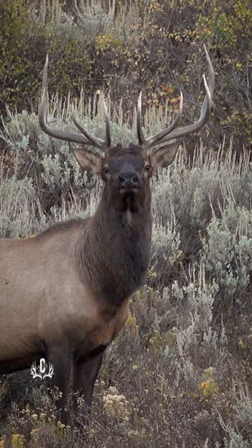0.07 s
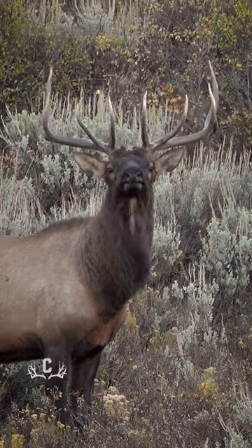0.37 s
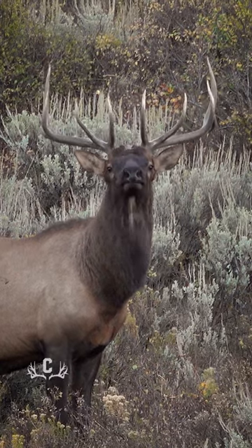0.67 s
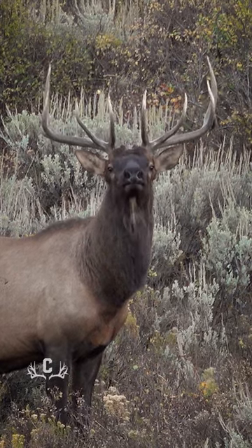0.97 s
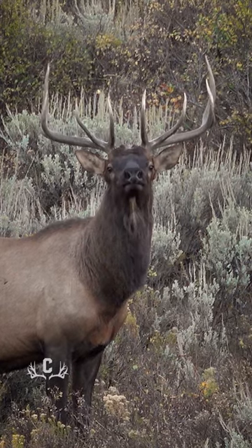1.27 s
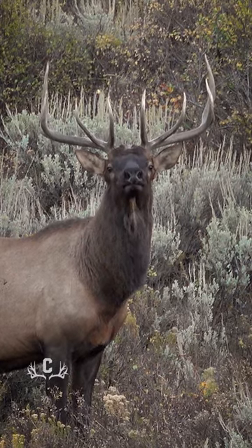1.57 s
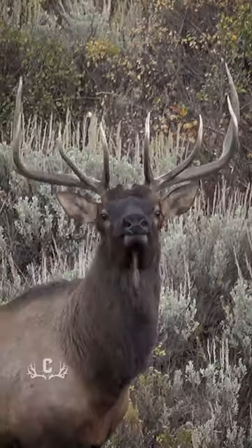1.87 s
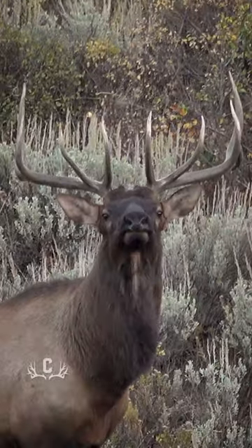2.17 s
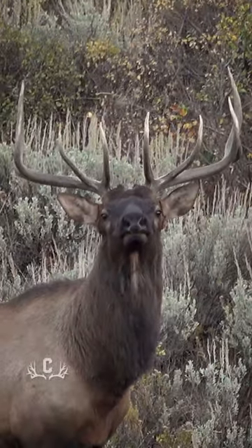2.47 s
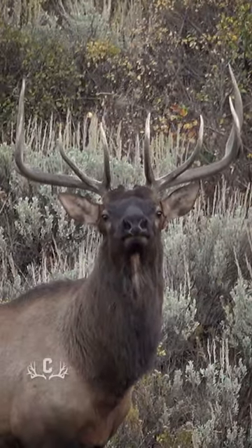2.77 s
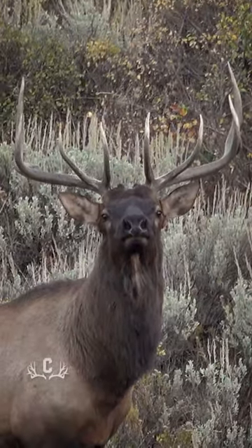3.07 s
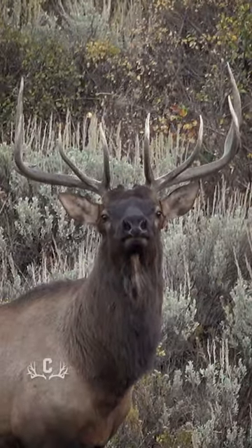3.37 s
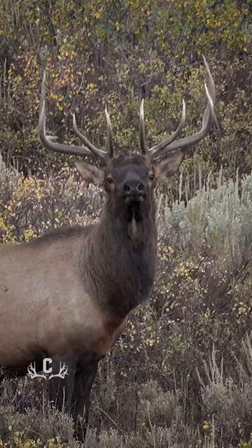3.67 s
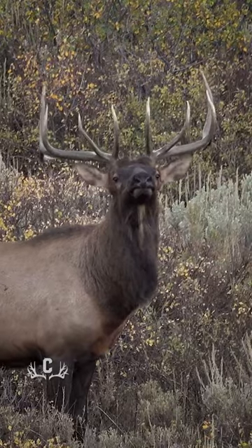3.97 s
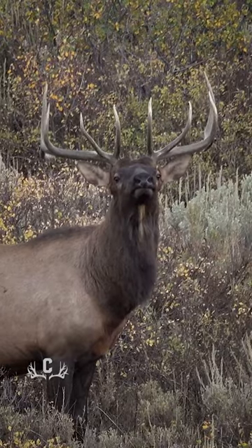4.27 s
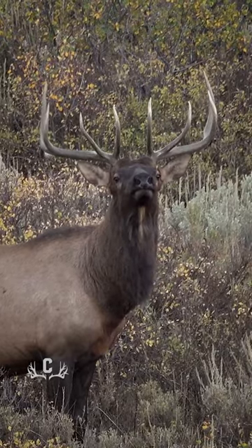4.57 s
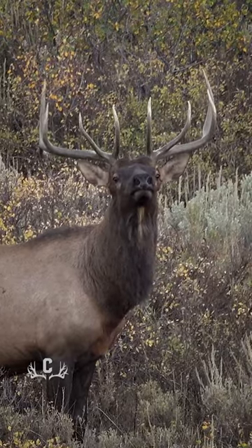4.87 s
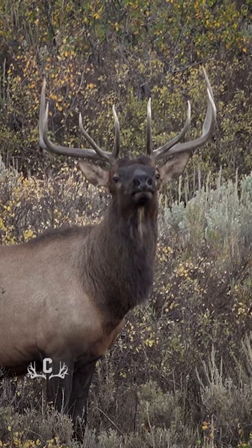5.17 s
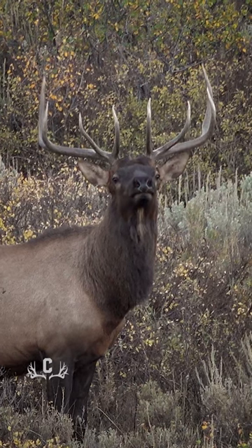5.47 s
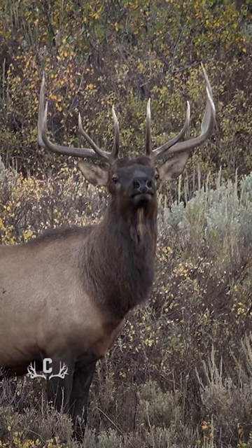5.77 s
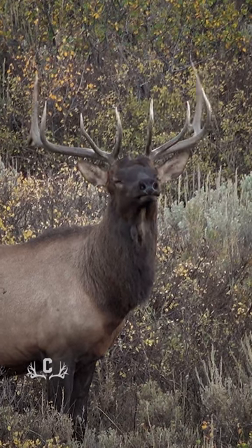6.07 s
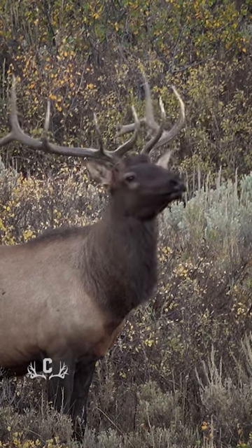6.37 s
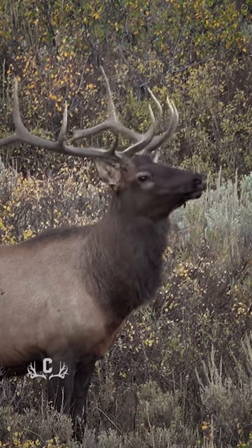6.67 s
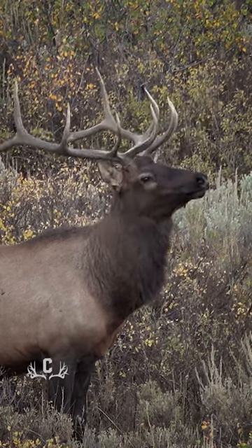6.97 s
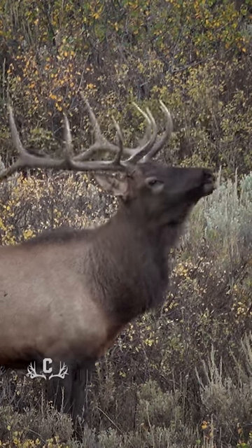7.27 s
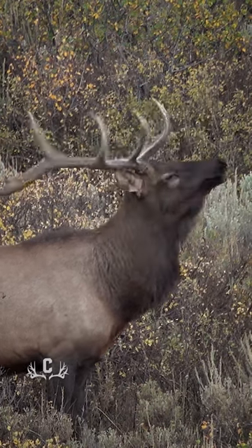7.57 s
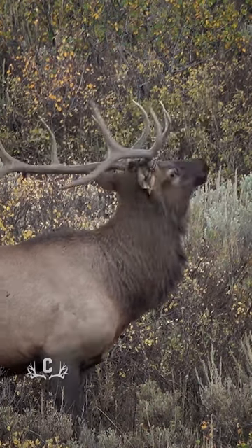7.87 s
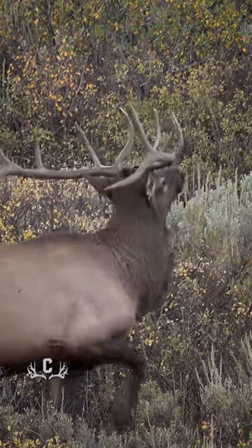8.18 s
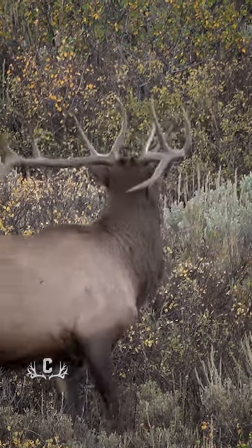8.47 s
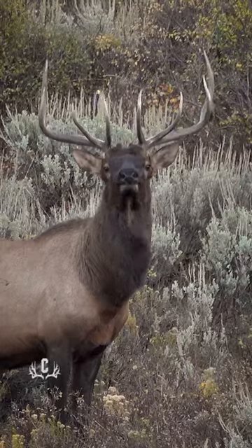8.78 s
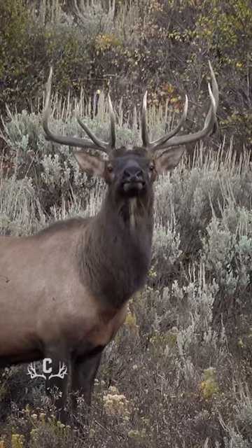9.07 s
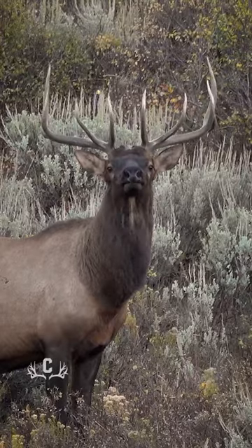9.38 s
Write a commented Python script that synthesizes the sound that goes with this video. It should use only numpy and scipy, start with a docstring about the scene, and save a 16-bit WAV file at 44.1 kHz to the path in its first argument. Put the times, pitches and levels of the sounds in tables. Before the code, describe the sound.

A bull elk barks five times, short rasping yelps and gruff calls, over faint distant insects in quiet scrubland.

```python
"""Quiet scrubland by a brushy slope, one microphone. A bull elk barks five times: three open yelps, two gruff.
Each bark sweeps up as the vocal folds tighten, breaks into a rasp and sinks into a soft, clean moan.
Nearby brush scatters the calls and the hillside answers. Far off, an insect chorus throbs in still air;
under it all lie the recorder's hiss, hum and whine."""
import sys
import numpy as np
from scipy import signal
from scipy.fft import rfft, irfft, next_fast_len
from scipy.io import wavfile
from scipy.ndimage import uniform_filter1d, map_coordinates

SR = 44100
rng = np.random.default_rng(int(sys.argv[2]) if len(sys.argv) > 2 else 0)


def unload_audio(sound):
    """Save the sound as a 16-bit wav file, at the path given as the first command line argument."""
    columns = np.transpose(np.atleast_2d(sound))
    # keep every value between -1 and 1, then stretch to whole-number steps
    steps = np.round(np.clip(columns, -1, 1) * 32767)
    wavfile.write(sys.argv[1], SR, steps.astype(np.int16))


N = 424683


def amp(db):
    """Decibels to gain."""
    return 10 ** (np.asarray(db) / 20)


def unit(x):
    """Scale to rms 1."""
    return x / np.sqrt(np.mean(x ** 2) + 1e-20)


def along(points, hz):
    """Read (f/Hz, value) points on a log frequency axis."""
    f, v = np.transpose(points)
    return np.interp(np.log(hz + 1), np.log(f + 1), v)


def wobble(rate, size):
    """A smooth random curve with rate knots a second."""
    return map_coordinates(rng.standard_normal(size + 4), [np.arange(size) * rate / SR], mode="nearest")


def filtered(x, response):
    """Pass x through a complex frequency response."""
    m = next_fast_len(len(x) + 8192)
    return irfft(rfft(x, m) * response(np.fft.rfftfreq(m, 1 / SR)), m)[:len(x)]


def noise(spectrum):
    """Steady noise of rms 1, coloured by (f/Hz, relative level/dB) points."""
    return unit(filtered(rng.standard_normal(N), lambda hz: amp(along(spectrum, hz))))


# Still air and hiss at the microphone: f/Hz, relative level/dB
AIR_SPECTRUM = [(25, -25), (70, -13.5), (150, -9), (350, -2.5), (650, -3.5), (1100, -6.5), (1800, -10.5),
                (3000, -16.5), (4500, -19), (6500, -19.5), (10000, -22.5), (16000, -28.5)]
# Mains hum in the recorder: f/Hz, level/dB
HUM_LINES = [(50.5, -68.5), (101.3, -67.5), (152, -69), (202.5, -71)]


def noise_floor(air_db=-50, whine_hz=13169, whine_db=-72.5):
    """Still air and hiss, with mains hum and a thin electrical whine."""
    t = np.arange(N) / SR
    lines = HUM_LINES + [(whine_hz, whine_db)]
    tones = sum(amp(db) * np.sqrt(2) * np.sin(2 * np.pi * (hz * t + rng.random())) for hz, db in lines)
    return amp(air_db) * noise(AIR_SPECTRUM) + tones


# The insect chorus, heard from far off: f/Hz, relative level/dB
INSECT_SPECTRUM = [(1750, -36), (2000, -22), (2110, -12.5), (2170, -9.5), (2255, -4.5), (2310, -6.5),
                   (2400, -8), (2520, -12.5), (2700, -22), (3100, -34)]


def insects(chorus_db=-50, flutter_db=1, flutter_rate=45, throb=0.13, throb_hz=27.26):
    """Many far insects merge into one narrow band that throbs loosely with their wing strokes."""
    stroke_hz = throb_hz * (1 + 0.102 * wobble(7, N))
    strokes = np.sin(2 * np.pi * np.cumsum(stroke_hz) / SR)
    level = amp(chorus_db + flutter_db * wobble(flutter_rate, N))
    return level * (1 + throb * strokes) * noise(INSECT_SPECTRUM)


# Time for the far hillside's wash to fall 60 dB: f/Hz, t/s
SLOPE_DECAY = [(200, 1), (600, 1.0), (1400, 0.48), (3500, 0.19)]
# Distinct returns from the hillside to the microphone: delay/s, level/dB
SLOPE_ECHOES = [(0.065, -23), (.11, -25)]


def slope(x, near_db=-14, near_t60=0.22, far_db=-19, swell_s=0.0077, low_hz=430):
    """Nearby brush scatters each bark at once; the hillside returns two soft echoes and a faint wash."""
    hz, t, (near, far) = signal.stft(rng.standard_normal((2, SR)), SR, nperseg=256)
    swell = 1 - np.exp(-(t / swell_s) ** 2)
    far_t60 = along(SLOPE_DECAY, hz)[:, None]
    brush = signal.istft(near * swell * amp(-60 * t / near_t60), SR, nperseg=256)[1]
    wash = signal.istft(far * swell * amp(-60 * t / far_t60), SR, nperseg=256)[1]
    echo = amp(near_db) * brush / np.linalg.norm(brush) + amp(far_db) * wash / np.linalg.norm(wash)
    for delay, db in SLOPE_ECHOES:
        echo[round(delay * SR)] += amp(db)
    # twigs hardly scatter the long waves
    return filtered(signal.fftconvolve(x, echo)[:N], lambda f: f ** 4 / (f ** 4 + low_hz ** 4))


def huffs(lead_s=0.0071, spread_s=0.052, thump_db=-57, hiss_db=-59):
    """A soft huff of air leads into each bark, just before the folds catch."""
    t = np.arange(N) / SR
    flow = sum(np.exp(-((t - start + lead_s) / spread_s) ** 2) for start, *_ in BARKS)
    thump = amp(thump_db) * noise([(20, -3), (70, -4), (200, -19), (600, -90)])
    hiss = amp(hiss_db) * noise([(800, -20), (2800, 4), (5000, -3), (8000, -24), (12000, -40)])
    return flow * (thump + hiss)


def rush(voice):
    """Air forced out with each bark adds a faint low rumble and a thin hiss."""
    flow = np.abs(uniform_filter1d(voice ** 2, size=4000)) ** 0.23
    rumble = amp(-42) * noise([(15, 11), (45, -14), (80, -11), (200, -30), (600, -90)])
    hiss = amp(-48) * noise([(1500, -40), (2700, 4), (3300, 5), (4500, -8), (7000, -15), (12000, -40)])
    return flow * (rumble + hiss)


# A thin whistle in the hardest bark: t/s, length/s, f/Hz, level/dB
SQUEAKS = [(4.139, 0.059, 3260, -57)]


def squeaks(waver=0.016):
    """Air whistles briefly in the narrowed throat."""
    out = np.zeros(N)
    for start, length, hz, db in SQUEAKS:
        size = round(length * SR)
        phase = 2 * np.pi * np.cumsum(hz * (1 + waver * wobble(220, size))) / SR
        out[round(start * SR):][:size] += amp(db) * unit(np.sin(phase) * signal.windows.tukey(size, .5))
    return out


def pitch_law(t, climb_s, break_s, top_hz, moan_hz, start_hz=321.45, warble_per_s=7.5, sag_hz_per_s=270):
    """The pitch climbs evenly, dips once if the top is held, breaks down to the moan and sags."""
    climb = start_hz * (top_hz / start_hz) ** np.minimum(t / climb_s, 1)
    hold_s = max(break_s - climb_s, 1 / SR)
    held = np.clip((t - climb_s) / hold_s, 0, 1)
    strained = climb * (1 - warble_per_s * hold_s * np.sin(np.pi * held) ** 2)
    after = np.maximum(t - break_s, 0)
    # at the break most of the tension goes at once; the rest ebbs
    tension = .82 * np.exp(-after / .003) + .18 * np.exp(-after / .028)
    return moan_hz + (strained - moan_hz) * tension - sag_hz_per_s * after


# Stages of a bark: the time at which the blast ends, then the lengths of the others
BLAST_END_S = 0.076
ATTACK_S, DROP_S, CRY_S, LULL_S, PUSH_S, RELEASE_S = 0.007, 0.011, 0.028, 0.046, 0.02, 0.022


def effort_law(t, blast_s, onset_db, blast_db, cry_db, moan_db,
               floor_db=-41, lull_db=-6.5, fade_db_per_s=71):
    """Level in dB: a swell to the blast, a drop to the cry, a lull, a last push that fades as the moan."""
    later_stages = np.cumsum([BLAST_END_S, DROP_S, CRY_S, LULL_S, PUSH_S])
    times = [0, ATTACK_S, min(blast_s, BLAST_END_S), *later_stages]
    levels = [floor_db, onset_db, blast_db, blast_db, cry_db, cry_db, moan_db + lull_db, moan_db]
    db = np.interp(t, times, levels) - fade_db_per_s * np.maximum(t - times[-1], 0)
    release = np.minimum((t[-1] - t) / RELEASE_S, 1)
    return floor_db + (db - floor_db) * release


def rasp_law(t, climb_s, break_s, hoarse, rasp_s, moan_rough=0.13, rasp_rough=0.54, lag_s=0.0087):
    """Roughness 0-1: the folds grow hoarse on the climb, chaotic at the break, nearly clean in the moan."""
    strain = np.minimum(t / climb_s, 1) * np.clip(1 - (t - break_s) / CRY_S, 0, 1)
    chaos = np.exp(-((t - break_s - lag_s) / rasp_s) ** 2)
    return np.clip(moan_rough + (hoarse - moan_rough) * strain + rasp_rough * chaos, .01, .95)


def throat(source, modes, low_hz=235, high_hz=3600):
    """Throat and mouth ring in steep-sided resonances with dark valleys between them."""
    def response(f):
        peaks = sum((-1) ** k * amp(db) * (1j * f * width / (hz * hz - f * f + 1j * f * width)) ** 2
                    for k, (hz, width, db) in enumerate(modes))
        return peaks * f ** 6 / (f ** 6 + low_hz ** 6) / (1 + (f / high_hz) ** 8)
    return filtered(source, response)


def bark(t, pitch, db, rough, modes, slack_s, overtone_db,
         drift=0.0243, jitter=0.0956, rolloff=0.41, slack_db=-9, closing_s=0.012):
    """Vocal folds glide along the pitch; when driven hard they beat unevenly and rasp."""
    size = len(t)
    # cycles vary in length and strength as the roughness grows
    pitch = pitch * (1 + drift * wobble(72.96, size) + jitter * rough * wobble(352.2, size))
    phase = 2 * np.pi * np.cumsum(pitch) / SR
    strength = np.sqrt(2 * (1 - rough ** 2)) * amp(3 * rough * wobble(407, size))
    # pressed folds are rich in overtones; slack ones give a nearly pure moan
    press = amp(overtone_db + slack_db * (1 + np.tanh((t - slack_s) / 0.024)) / 2)
    closure = 1 - np.exp(-(t / closing_s) ** 2)  # the folds take a moment to close fully
    overtones = press * closure * sum((k - 1) ** -rolloff * np.sin(k * phase) for k in range(2, 9))
    # at the break strong and weak cycles alternate
    subharmonics = amp(-5) * rough * (np.sin(phase / 2) + np.sin(3 * phase / 2))
    puffs = rng.standard_normal(size) * (1 + 0.82 * np.cos(phase))  # turbulence, one puff a cycle
    tone = strength * np.sin(phase) + throat(strength * (overtones + subharmonics), modes)
    voice = tone + rough * unit(throat(puffs, modes))
    # every mix of tone and noise is equally loud
    voice = voice / np.sqrt(np.abs(uniform_filter1d(voice ** 2, size=400)) + 1e-9)
    # after the blast the level dips in brief, uneven fades
    fades_db = 3.5 * (.7 - wobble(64.9, size) ** 2) * np.clip((t - BLAST_END_S) / CRY_S, 0, 1)
    shudder_db = 2.5 * rough * (.5 - wobble(110.5, size) ** 2)
    return amp(db + fades_db + shudder_db) * voice * signal.windows.tukey(size, .03)


# Resonances of four shapes of throat and mouth: f/Hz, width/Hz, level/dB
YELP_THROAT = [(270, 310, -2.5), (752, 180, 3.5), (1080, 94, -1.5), (1436, 255, 2), (1697, 160, -5.5),
               (1947, 176, 0), (2410, 210, -17.5), (2800, 310, -15.5)]
GRUFF_THROAT = [(310, 113, 6), (590, 220, -3), (854, 190, -4), (1103, 160, -6.5), (1480, 600, -14.5),
                (2590, 700, -24)]
SHARP_THROAT = [(260, 170, 1), (644, 330, 5.5), (1030, 180, 0), (1330, 230, -1), (1685, 230, 2),
                (1990, 120, -3), (2300, 164, -0.5), (2810, 390, -9.5), (3220, 130, -23)]
GRUNT_THROAT = [(395, 260, 6), (570, 135, -1.5), (713, 65, 5), (975, 140, -3), (1290, 160, -3),
                (1700, 860, -19), (3260, 230, -26)]
# How well each pitch carries to the microphone: f/Hz, gain/dB
CARRY = [(300, -1), (380, -0.5), (430, -1.5), (485, -6.5), (580, 2.5), (720, -2.5), (890, -3.5),
         (970, -0.5), (1150, -2), (1300, 0.5)]
# The bull's barks, levels before CARRY: t/s, length/s, climb/s, blast after/s, break after/s,
# top f/Hz, moan f/Hz, onset level/dB, blast level/dB, cry level/dB, moan level/dB, hoarseness/0-1,
# rasp half-length/s, folds slacken after/s, overtone gain/dB, throat shape
BARKS = [(.416, 0.29, 0.047, 0.053, 0.076, 1049, 367, -32.5, -19.5, -30.5, -33.5, 0.35, 0.026, .092, -4, YELP_THROAT),
         (2.161, .274, 0.033, 0.05, 0.041, 430, 350, -29.5, -24.5, -28.5, -38, 0.13, 0.042, .18, -9.5, GRUFF_THROAT),
         (4.033, .319, .069, 0.051, .079, 1343, 369.4, -31, -18.5, -24.5, -34, 0.28, .013, 0.06, -4.5, SHARP_THROAT),
         (7.433, .253, .04, 0.082, .043, 620, 339.4, -38, -20, -31, -38.5, 0.34, 0.017, 0.062, -7, GRUNT_THROAT),
         (9.058, 0.29, .044, 0.05, 0.074, 1050, 366.3, -33, -20, -30, -34, 0.37, 0.027, 0.084, -4, YELP_THROAT)]


def elk():
    """The bull, in front of it all: every bark follows the same laws of pitch, effort and rasp."""
    out = np.zeros(N + SR)
    for (start, length, climb_s, blast_s, break_s, top_hz, moan_hz, onset_db, blast_db, cry_db, moan_db,
         hoarse, rasp_s, slack_s, overtone_db, modes) in BARKS:
        t = np.arange(round(length * SR)) / SR
        pitch = pitch_law(t, climb_s, break_s, top_hz, moan_hz)
        rough = rasp_law(t, climb_s, break_s, hoarse, rasp_s)
        db = effort_law(t, blast_s, onset_db, blast_db, cry_db, moan_db) + along(CARRY, pitch)
        out[round(start * SR):][:len(t)] += bark(t, pitch, db, rough, modes, slack_s, overtone_db)
    return out[:N]


def scene():
    """At the microphone: the elk, its echo off the slope, its breath and the quiet around it."""
    voice = elk() + squeaks()
    return (voice + slope(voice) + rush(voice) + huffs() + insects() + noise_floor())[None]


def record(dry, start_s=.057, top_hz=15900):
    """The recorder opens after a moment of silence and keeps nothing above its band limit."""
    running = np.arange(N) / SR >= start_s
    return np.array([filtered(channel * running, lambda hz: hz < top_hz) for channel in dry])


dry = scene()
out = record(dry)
unload_audio(out)
```